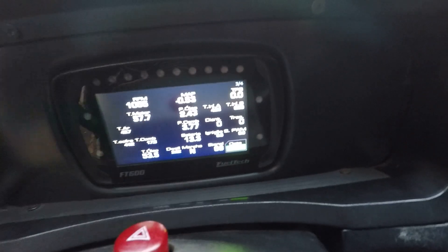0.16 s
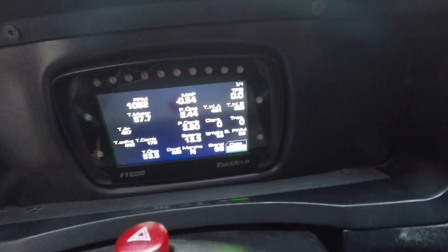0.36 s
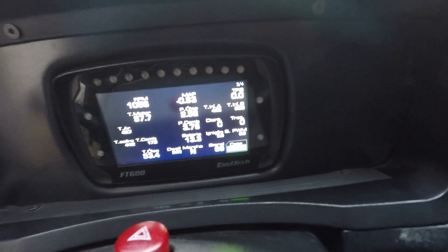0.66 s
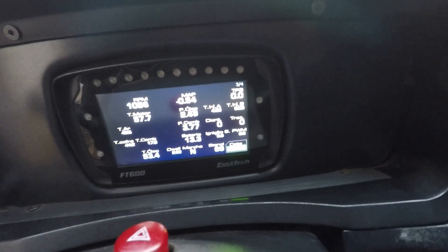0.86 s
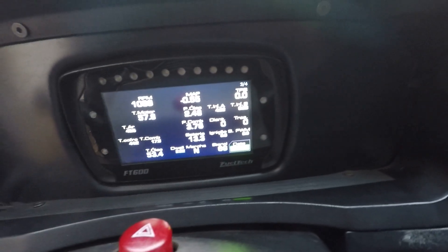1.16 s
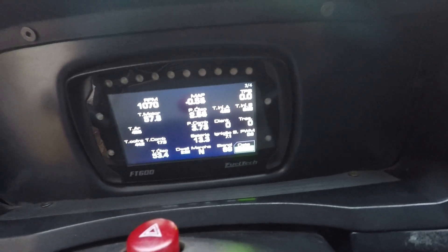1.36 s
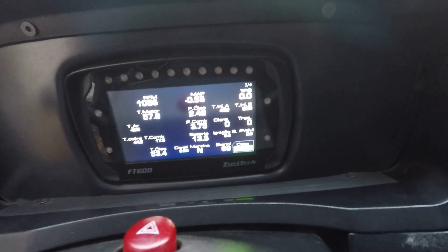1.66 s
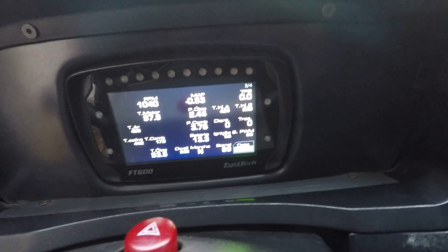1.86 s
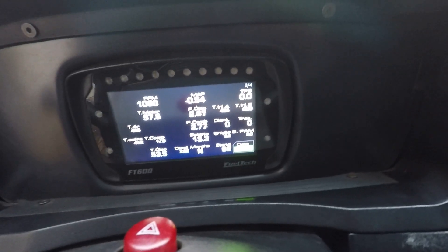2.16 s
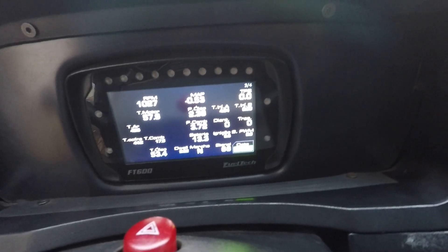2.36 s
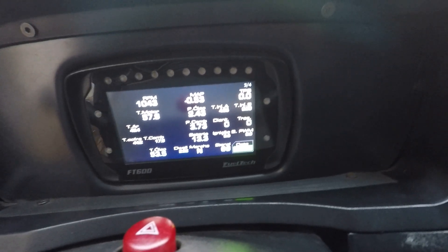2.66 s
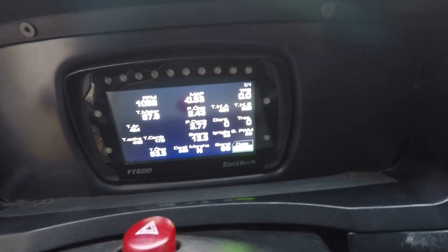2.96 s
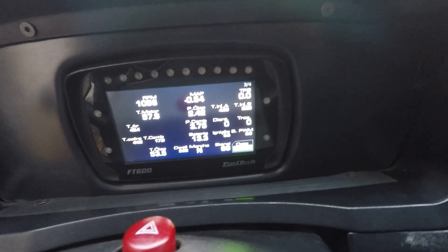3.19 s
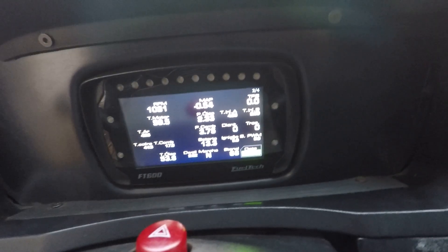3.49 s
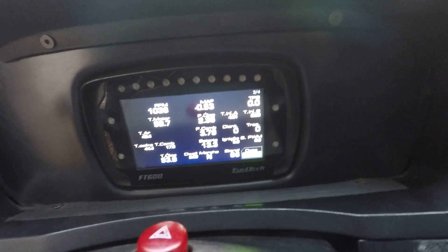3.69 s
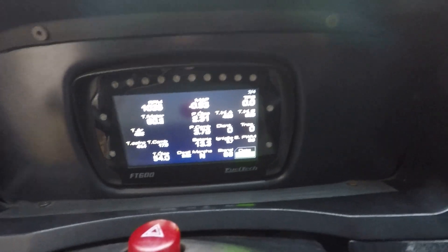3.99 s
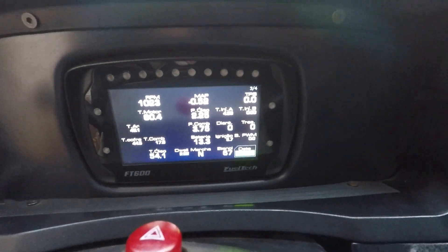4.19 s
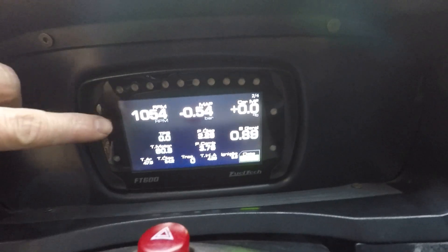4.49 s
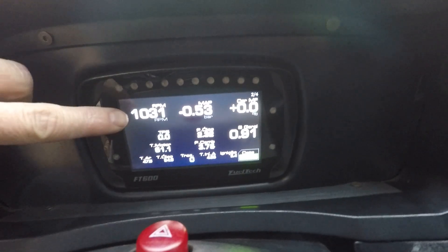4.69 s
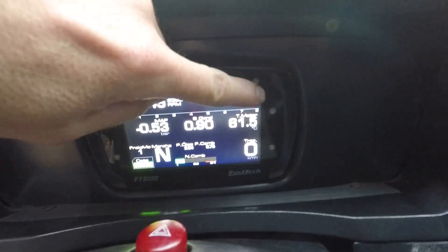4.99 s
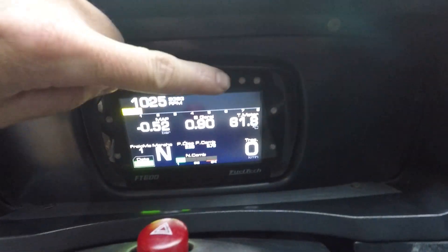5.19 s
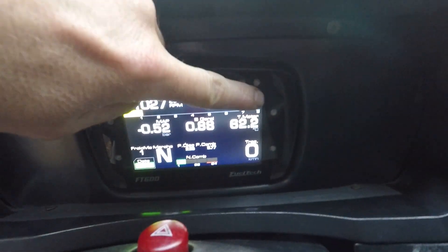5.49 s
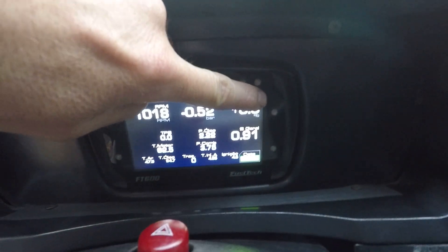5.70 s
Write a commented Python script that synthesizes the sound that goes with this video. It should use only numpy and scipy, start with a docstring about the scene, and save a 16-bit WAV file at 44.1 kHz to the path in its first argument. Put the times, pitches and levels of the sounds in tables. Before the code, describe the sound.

A warm engine hums at idle, its fast even firings merging into a deep throbbing boom in the car's interior. Quiet metallic clatter and dull intake air ride on top, and one tiny snap clicks near the start. The engine does not wind down but vanishes abruptly past the middle, then featureless stereo noise sets in at once and holds level to the end. The in-cabin microphone leans a little left.

```python
"""In a workshop, heard from the cabin, a four-cylinder car engine idles: each firing rings the resonances
of exhaust and cabin. Valve taps and knocking noise ring small panels, shaped noise makes the air rush
and the low rumble, and three quick snaps are heard as one tick.
The sound is cut dead; after a short silence an even, wide hiss of noise sets in and stays."""
import sys
import numpy as np
from scipy import signal
from scipy.fft import rfft, irfft
from scipy.io import wavfile

SR = 44100
rng = np.random.default_rng(int(sys.argv[2]) if len(sys.argv) > 2 else 0)


def unload_audio(sound):
    """Save the sound as a 16-bit wav file, at the path given as the first command line argument."""
    columns = np.transpose(np.atleast_2d(sound))
    # keep every value between -1 and 1, then stretch to whole-number steps
    steps = np.round(np.clip(columns, -1, 1) * 32767)
    wavfile.write(sys.argv[1], SR, steps.astype(np.int16))


N = 257896      # length in samples

FIRST_FIRING_S = .0276
ODD_EVEN_DB, ODD_EVEN_S = 0.18, 0.000047      # every other firing is stronger and later
SCATTER_DB, SCATTER_S = -0.02, .00006         # chance spread from firing to firing
MUFFLER_HZ, RIGHT_LAG_S = 617, 0.000087
KNOCK_LENGTH = 0.085                          # share of the firing cycle
TAP_DB, TAP_SCATTER_DB, TAP_SCATTER_S = 19.5, 2, .0004   # valve tap strength, its spread in strength and time
PANEL_SIDE_DB, BULKHEAD_HZ = -7, 8700
RUSH_DB = -50.5
TICK_DECAY_S = 0.0036
RUMBLE_DB, RUMBLE_SIDE_DB, RUMBLE_LEFT_DB = -33.5, -7.5, 5   # the last is left over right
CUT_S, HISS_FROM_S, HISS_DB = 3.3936, 3.4213, -37
MIC_TOP, CUTOFF_HZ = 2.54, 16200              # MIC_TOP is the largest height the microphone passes


def from_db(db):
    """Turns decibels into a gain to multiply by."""
    return 10 ** (np.asarray(db) / 20)


def rms_one(x):
    """Scales a signal to an rms (average strength) of 1."""
    return x / np.sqrt(np.mean(x ** 2) + 1e-20)


def drift(rate):
    """Slow chance wandering: noise twice through a one-pole low-pass at rate Hz, with spread 1."""
    r = np.exp(-2 * np.pi * rate / SR)
    slow = signal.lfilter([1], [1, -2 * r, r * r], rng.standard_normal(N + SR))
    return rms_one(slow[SR:])       # the first second only settles the filter


def ring(x, hz, width):
    """A resonance: each unit click sets off a dying sine of starting height 1; wider dies faster."""
    r = np.exp(-np.pi * width / SR)
    w = 2 * np.pi * hz / SR
    return signal.lfilter([0, np.sin(w)], [1, -2 * r * np.cos(w), r * r], x + 1e-18)


def coloured(spectrum):
    """Two unrelated channels of noise shaped by a spectrum; the mean of left and right has rms about 1."""
    hz = np.maximum(np.arange(N // 2 + 1) * SR / N, 1)
    points = np.array(spectrum)
    gain = from_db(np.interp(np.log(hz), np.log(points[:, 0]), points[:, 1]))
    noise = irfft(rfft(rng.standard_normal((2, N))) * gain, N)
    return np.sqrt(2) * rms_one(noise)


def firing_cycles():
    """Adds up the drifting idle speed into a count of firings, from half a second before zero."""
    # idle speed: [t/s, firings per s]
    idle = [(0.0, 36.56), (0.3, 36.15), (1.44, 36.95), (1.58, 36.13), (2.22, 35.36), (2.84, 36.04),
            (3.39, 37.08)]
    t = np.arange(-(SR // 2), N) / SR
    cycles = np.cumsum(np.interp(t, *np.transpose(idle))) / SR
    return cycles - np.interp(FIRST_FIRING_S, t, cycles)


def exhaust(cycles):
    """One blow per firing into the fixed resonances, so the harmonics swell and sink as the speed drifts."""
    # exhaust and cabin resonances:
    # [f/Hz, width/Hz, left level/dB, left over right/dB, push +1 or pull -1]
    boom = [(35.32, 8.87, -13.5, -2.5, -1), (66.9, 11.3, -15.5, 0.5, 1), (110.75, 16.3, -14, 3.5, 1),
            (133.9, 38.9, -4, 3.5, -1), (177, 20, -26, 16, -1), (189, 12, -44, 8, -1),
            (217.76, 15.5, -14, 5, -1), (237.2, 25.4, -20.5, 0.2, 1), (297.9, 8.9, -28, 6.5, 1),
            (329.5, 13.3, -30, 20, -1), (404, 24.9, -16.5, 8.5, -1), (409.8, 30, -18.0, 7, 1),
            (473.5, 16.6, -35, 10, 1), (435.7, 13, -41.5, 10, -1), (560, 8.6, -41.5, 17, 1)]
    # what the unlike halves of the manifold add with alternating sign:
    # [f/Hz, width/Hz, left level/dB, left over right/dB]
    lope = [(60, 13, -43, -1), (132, 23, -52, 3), (207.5, 7.9, -41, 4)]
    fired = np.flatnonzero(np.diff(np.floor(cycles)) > 0)
    odd = (-1.) ** np.arange(len(fired))
    chance = rng.standard_normal((len(fired), 2))
    late_s = ODD_EVEN_S * odd + SCATTER_S * chance[:, 0]
    at = np.clip(fired + np.round(late_s * SR).astype(int), 0, None)

    blows = np.zeros(N + SR)
    blows[at] = from_db(ODD_EVEN_DB * odd + SCATTER_DB * chance[:, 1])
    alternating = np.zeros(N + SR)
    alternating[at] = odd

    out = 0
    for hz, width, db, left_db, push in boom:
        out = out + np.sign(push) * from_db([[db], [db - left_db]]) * ring(blows, hz, width)
    for hz, width, db, left_db in lope:
        out = out + from_db([[db], [db - left_db]]) * ring(alternating, hz, width)
    # the blow is a soft puff without treble or steady push; it reaches the right side a little later
    puff = signal.butter(4, [12, MUFFLER_HZ], "band", fs=SR, output="sos")
    out = signal.sosfiltfilt(puff, out)
    out[1] = np.roll(out[1], round(RIGHT_LAG_S * SR))
    return out[:, SR // 2:SR // 2 + N]


def knock_gate(cycles, place, lift_db):
    """Gain that swells briefly once per firing, by an amount that varies."""
    distance = (cycles - place + .5) % 1 - .5     # from the knock, in firing cycles
    bump = np.exp(-.5 * (distance / KNOCK_LENGTH) ** 2)
    return from_db(lift_db * bump * (1 + 0.3 * drift(32)))


def taps(cycles, place):
    """One valve click per firing at a set place in the cycle, uneven in strength and time."""
    at = np.flatnonzero(np.diff(np.floor(cycles - place)) > 0)
    chance = rng.standard_normal((len(at), 2))
    at = np.clip(at + np.round(TAP_SCATTER_S * SR * chance[:, 0]).astype(int), 0, N - 1)
    out = np.zeros(N)
    out[at] = from_db(TAP_DB + TAP_SCATTER_DB * chance[:, 1])
    return out


def clatter(cycles):
    """Valve taps and noise that knocks with each firing ring the panels; each has its own balance and wavers."""
    # panels rung by the valve gear:
    # [f/Hz, width/Hz, level/dB, left over right/dB, knock place in the firing cycle 0-1, knock lift/dB]
    panels = [(591, 50, -51, 10.5, 0.4, 3.5), (719, 28, -57.5, 10, .4, 1), (780, 51, -55.5, -3, 0.9, -4),
              (833, 28, -50.5, 3, 0.2, 3), (919, 24, -54, 11, .3, 7), (1100, 49, -62.5, -5, 0.2, -6.5),
              (1150, 110, -47, 3.5, .25, 12), (1224, 24, -58, -8, 0.1, 4), (1324, 67, -47.5, -0.5, .26, 5),
              (1533, 55, -57.5, 1.5, 0, 10), (1618, 35, -51, 4.5, .22, 8), (1770, 77, -54.5, -1.5, .2, 9),
              (2580, 170, -62, 5.5, 0.2, 13), (3620, 650, -54.5, 0, .2, 3),
              (5930, 1400, -53.5, 5.5, .6, 5.5)]
    # panels that push the left side while they pull the right: [row in panels, from 0]
    opposed = [2, 3, 6, 10, 11]
    out = 0
    for row, (hz, width, db, left_db, place, lift_db) in enumerate(panels):
        mid, side = rng.standard_normal((2, N))
        noise = mid + from_db(PANEL_SIDE_DB) * side * [[1], [-1]]
        knocks = noise * knock_gate(cycles, place, lift_db)
        knocks = knocks + from_db(lift_db) * taps(cycles, place)
        right_sign = -1 if row in opposed else 1
        sides = from_db([[left_db / 2], [-left_db / 2]]) * [[1], [right_sign]]
        level = from_db(db + 0.75 * drift(2.9))
        out = out + level * sides * rms_one(ring(knocks, hz, width))
    return signal.sosfilt(signal.butter(2, BULKHEAD_HZ, fs=SR, output="sos"), out)   # the bulkhead dulls it


def rush(cycles):
    """Intake and belt noise: shaped noise that wavers, flickers and throbs a little with the firings."""
    # colour of the rush: [f/Hz, relative level per Hz/dB]
    rush_colour = [(880, -33.5), (1500, -10), (1590, -15), (1900, -7.5), (2320, -8.5), (2680, -6.5),
                   (3730, -14), (4960, -14), (6230, -5.5), (9280, -15), (14500, -35.5)]
    level = from_db(RUSH_DB + 0.61 * drift(1.8) + 0.55 * drift(14))
    return level * knock_gate(cycles, 0.28, 2.3) * coloured(rush_colour)


def ticks():
    """Three short bright snaps in quick succession: bursts of noise that start at once and die away."""
    # starts of the snaps: [t/s, starting level/dB]
    snaps = [(0.9845, -29.5), (0.989, -30.5), (0.9955, -39)]
    # colour of the snaps: [f/Hz, relative level per Hz/dB]
    snap_colour = [(710, -28), (1200, 8), (4270, -7.5), (4890, -10.5), (6510, 0), (11500, -7.5),
                   (13900, -22), (15000, -65)]
    t = np.arange(N) / SR
    shape = 0
    for start, db in snaps:
        shape = shape + from_db(db) * (t > start) * np.exp(-np.maximum(t - start, 0) / TICK_DECAY_S)
    return shape * coloured(snap_colour)


def rumble():
    """Low body noise between the harmonics, much alike on both sides and louder on the left."""
    # colour of the rumble: [f/Hz, relative level per Hz/dB]
    rumble_colour = [(12, -16), (25, -12), (60, -6), (92, -10), (128, -11.5), (165, -17), (205, -6.5),
                     (260, -19), (337, -26.5), (399, -20), (771, -41.5), (1330, -49), (1800, -57),
                     (2340, -84.5)]
    mid, side = coloured(rumble_colour)
    sides = mid + from_db(RUMBLE_SIDE_DB) * side * [[1], [-1]]
    wavering = from_db(1.5 * drift(6))
    return from_db([[RUMBLE_DB], [RUMBLE_DB - RUMBLE_LEFT_DB]]) * wavering * sides


def hiss():
    """Steady noise, unrelated on the two sides and so wide, that sets in at once and stays."""
    # colour of the hiss: [f/Hz, relative level per Hz/dB]
    hiss_colour = [(12, -37), (20, -2), (282, -3), (353, -2), (429, -3.5), (2350, -2.5), (15600, -3)]
    t = np.arange(N) / SR
    return from_db(HISS_DB) * coloured(hiss_colour) * (t > HISS_FROM_S)


def scene():
    """The running engine up to the cut, then the hiss."""
    cycles = firing_cycles()
    heard = cycles[SR // 2:]        # the engine already runs before zero
    engine = exhaust(cycles) + clatter(heard) + rush(heard) + ticks() + rumble()
    t = np.arange(N) / SR
    return engine * (t < CUT_S) + hiss()


def record(dry):
    """The microphone rounds the loudest peaks; the top is cut steeply."""
    rounded = MIC_TOP * np.tanh(dry / MIC_TOP)
    return signal.sosfilt(signal.cheby2(16, 70, CUTOFF_HZ, fs=SR, output="sos"), rounded)


dry = scene()
out = record(dry)
unload_audio(out)
```